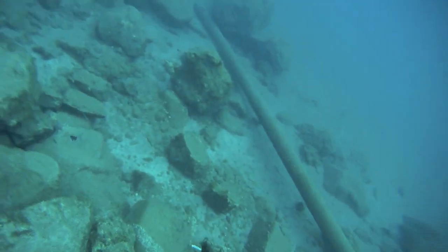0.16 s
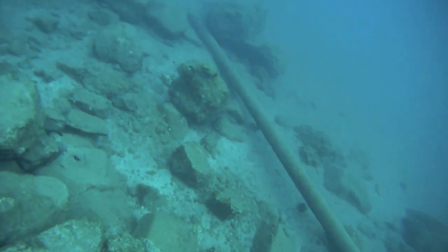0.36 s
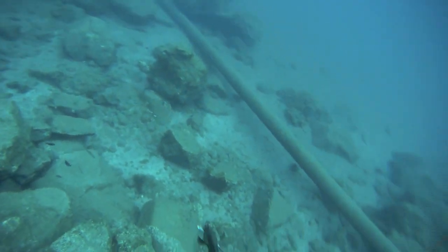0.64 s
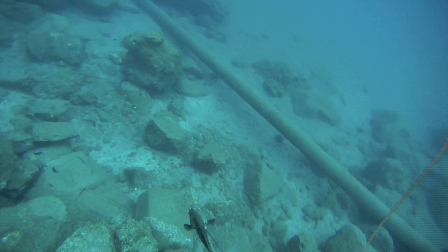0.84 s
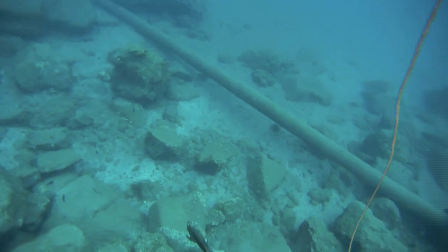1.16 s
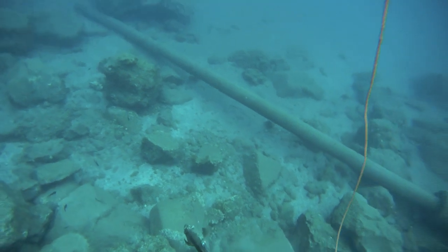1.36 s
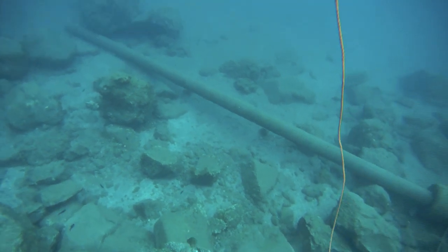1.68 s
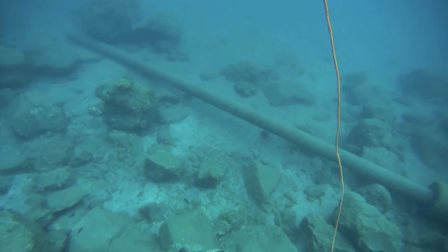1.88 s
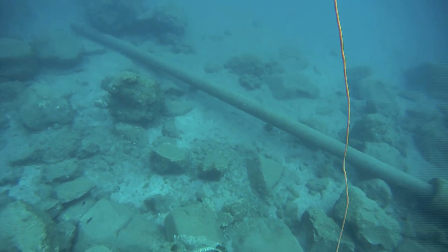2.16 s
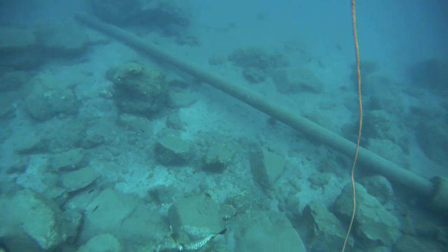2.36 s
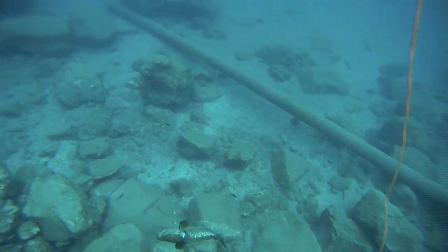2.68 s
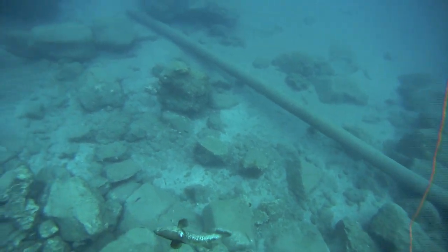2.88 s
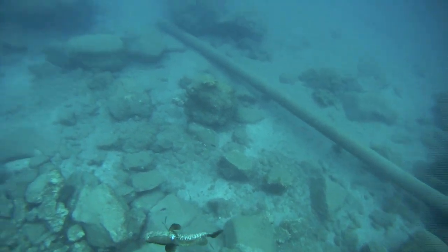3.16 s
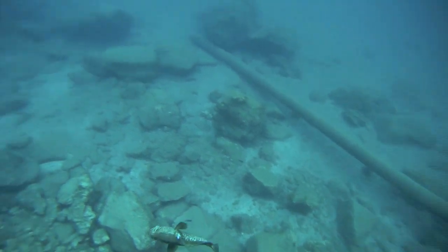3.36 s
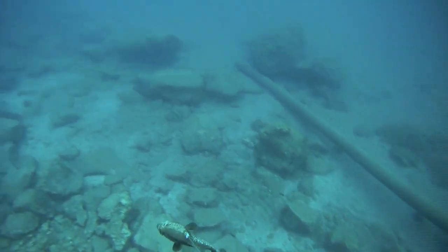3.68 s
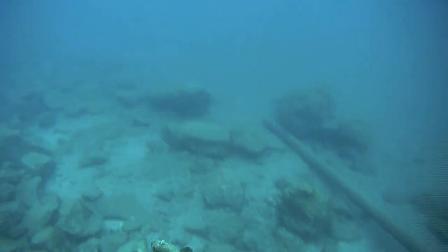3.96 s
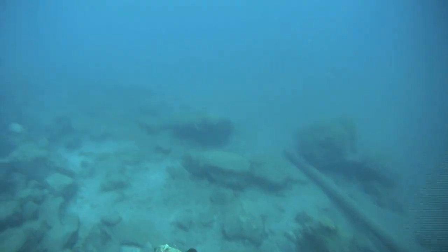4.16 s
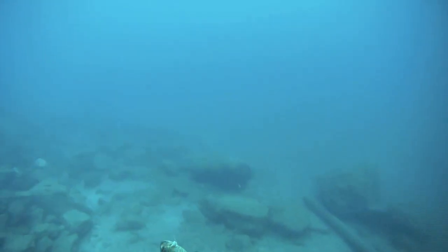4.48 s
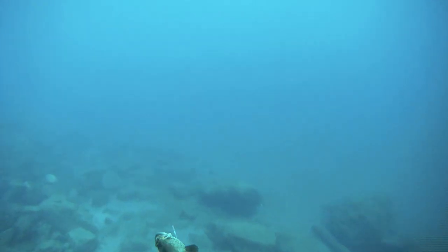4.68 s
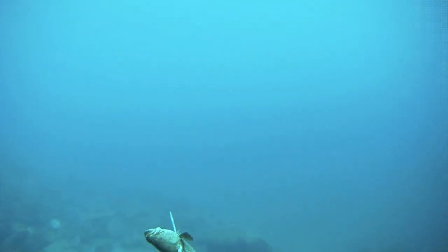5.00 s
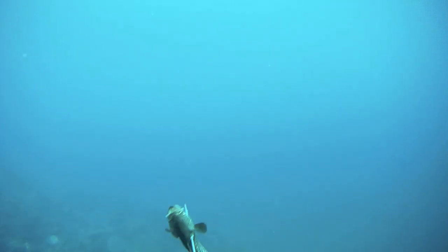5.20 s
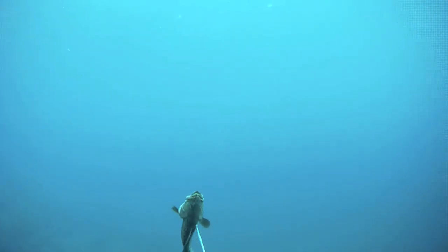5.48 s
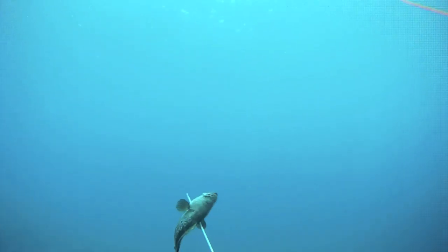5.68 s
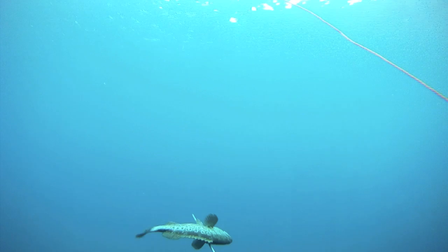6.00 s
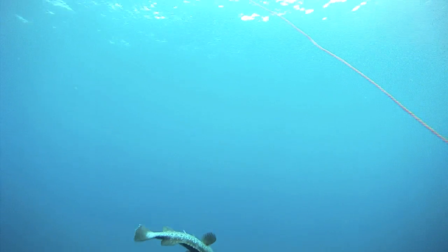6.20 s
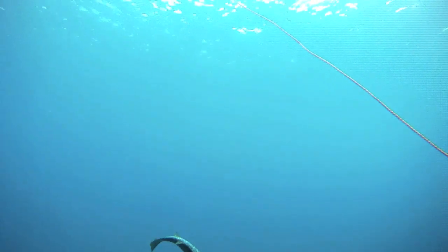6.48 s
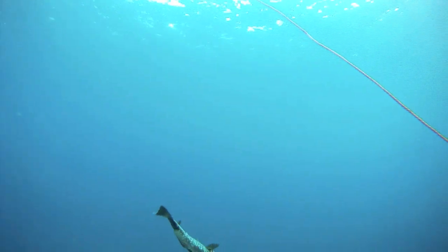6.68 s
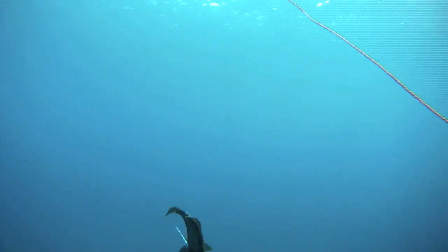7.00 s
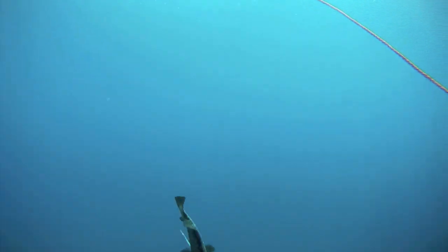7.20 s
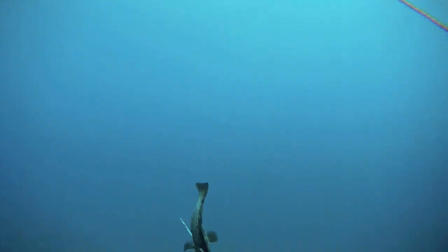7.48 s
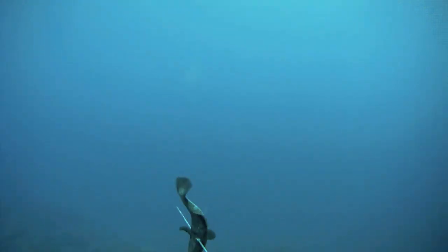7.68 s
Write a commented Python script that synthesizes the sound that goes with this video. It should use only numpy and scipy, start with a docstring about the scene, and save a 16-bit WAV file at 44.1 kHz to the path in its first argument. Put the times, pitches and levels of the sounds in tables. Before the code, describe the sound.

Muffled underwater crackling near a rocky seabed, punctuated by crisp shrimp snaps, housing taps, a cluster of thumps midway, and louder snaps later.

```python
"""Sharp shrimp snaps, near and far, over a low rumble of water, with taps and thumps close by.
Place: a rocky seabed, where a diver carries a camera in a sealed housing; its microphone hears through the wall.
Distance: near snaps are pulses with echoes, far ones a crackle; gear taps and thumps the housing itself.
Water is shaped noise, with bubbles and housing as ringing modes; thin metal parts ring as decaying sines.
The microphone is sampled at a low rate and held, which mirrors the sound into the treble."""
import sys
import numpy as np
from scipy import signal
from scipy.fft import rfft, irfft
from scipy.io import wavfile

SR = 44100
rng = np.random.default_rng(int(sys.argv[2]) if len(sys.argv) > 2 else 0)


def dump_mix(stems):
    """Bounce the given channels to the path in sys.argv[1] as a 16-bit WAV at rate SR."""
    frames = np.atleast_2d(stems).T  # one column per channel
    limited = np.clip(frames, -1, 1)  # hard clip at full scale
    pcm = np.round(limited * 32767).astype(np.int16)
    wavfile.write(sys.argv[1], SR, pcm)


def gain_from_db(level_db):
    """Convert decibel levels to linear amplitude factors (20 dB per decade)."""
    decades = np.asarray(level_db, float) / 20
    return 10 ** decades


N = 345744   # samples, 7.84 s

# Faint hiss, opposite in the two channels; relative spectrum: (frequency [Hz], density [dB per Hz])
CHANNEL_HISS = [(100, -4), (800, 5.5), (5000, -5)]
# Far crackle, before its slow wander: (time [s], level [dB])
CRACKLE_LEVEL = [(0.0, -53), (0.35, -60), (0.65, -56), (1.75, -57.5), (2.12, -56), (2.4, -58), (4.6, -58.5),
                 (5.6, -58), (6.5, -56.5), (7.84, -57)]
# Push of the water as deep rumble, before its slow wander: (time [s], level [dB])
WATER_PUSH = [(0.0, -48.5), (0.13, -46.5), (0.25, -49), (0.87, -58), (1.14, -51.5), (1.7, -60.5),
              (3.6, -62.5), (3.8, -53.5), (4.19, -48), (4.3, -59), (4.6, -53), (4.75, -58.5), (6.05, -57.5),
              (6.22, -50), (6.7, -59), (7.4, -55), (7.84, -54)]
# Relative spectrum of the deep rumble: (frequency [Hz], density [dB per Hz])
RUMBLE_SPECTRUM = [(12, -26), (25, -0.5), (40, 8.5), (70, -6.5), (120, -4.5), (150, -7), (200, -29.5),
                   (300, -56)]
# Relative spectrum of the gurgle, before stirring: (frequency [Hz], density [dB per Hz])
GURGLE_SPECTRUM = [(41, -28.5), (70, 3.5), (205, -9.5), (351, -7.5), (827, -16), (1120, -18), (1300, -14),
                   (1690, -17.5), (2860, -120)]
# What passes the housing wall, relative: (frequency [Hz], density [dB per Hz])
WALL_SPECTRUM = [(530, -46.5), (900, -26.5), (1120, -29), (1230, -9.5), (1400, -14), (1530, -8.5),
                 (2140, 0), (2980, -6), (3240, -9.5), (3590, -5), (4560, -10.5), (5080, -5.5),
                 (5700, -10.5), (7410, -61.5), (12500, -120)]
# Narrow resonances of the air space, added to the wall: (frequency [Hz], width [Hz], lift [dB])
AIR_SPACE = [(1345, 26, 3.5), (2170, 44, 2), (3604, 140, 4), (5000, 300, 0.5)]
# Thin metal parts ringing; level is before the swell:
# (time [s], level [dB], pitch [Hz], 60 dB decay [s])
METAL_RINGS = [(0.804, -37, 3880, 0.038), (4.472, -49.5, 5530, 0.33)]
# Taps on the housing; level is before the mode levels: (time [s], level [dB], favoured pitch [Hz])
HOUSING_TAPS = [(0.071, -48, 460), (0.155, -47, 374), (0.324, -48, 385), (0.389, -50, 595),
                (0.556, -47, 390), (0.77, -43, 422), (0.843, -47.5, 326), (1.201, -42, 466),
                (1.261, -41.5, 470), (1.433, -44, 405), (1.626, -44, 397), (1.787, -46, 670),
                (2.0, -46.5, 476), (2.684, -48.5, 662), (2.746, -43, 680), (3.027, -43, 670),
                (5.611, -43.5, 355), (5.799, -43, 443), (5.874, -42.5, 363), (6.495, -41, 365),
                (6.575, -44.5, 454), (7.387, -41.5, 403), (7.744, -45.5, 387)]
# Housing modes under a tap, relative level: (frequency [Hz], level [dB], 60 dB decay [s])
SHELL_MODES = [(384, -4, 0.059), (456, -5, 0.078), (670, -1, 0.066), (967, -0.5, 0.028), (1419, 0.5, 0.093),
               (600, -13, 0.036), (1170, 6, 0.014), (1870, 14, 0.006)]
# Dull thumps; level is before the onset, pitch is where the sag ends:
# (time [s], level [dB], pitch [Hz], 60 dB decay [s])
DULL_THUMPS = [(2.342, -28, 129, 0.04), (3.102, -24, 120, 0.042), (3.5088, -26, 123, 0.075),
               (3.708, -23.5, 124, 0.069), (3.742, -32, 66, 0.13), (3.779, -23.5, 107.7, 0.089),
               (3.801, -15, 295, 0.024), (6.1371, -26.5, 520, 0.018)]
# Near snaps; pulse level is before band split and wall, echo level before build-up and decay:
# (time [s], pulse level [dB], treble against body [dB], echoes against pulse [dB])
NEAR_SNAPS = [(0.1263, -37, -7, -13.5), (0.272, -40, 1, -19.5), (0.5125, -36.5, -2.5, -16.5),
              (0.5534, -38.5, 7.5, -16.5), (0.83, -32.5, -9, -18), (1.1084, -36, -2, -17),
              (1.2369, -41, 5.5, -15), (1.446, -38.5, -6, -15.5), (1.787, -39, -2.5, -12),
              (1.9467, -30, -22, -26.5), (1.982, -29.5, 8, -24.5), (2.03, -36, -14, -20),
              (2.0773, -41, 6, -13.5), (2.1465, -41.5, 6.5, -13.5), (2.227, -39, -9, -13.5),
              (2.3037, -32, -22, -23.5), (2.3344, -36, -13, -26), (2.4412, -41.5, 12, -33),
              (2.5561, -42.5, 3, -14), (2.5867, -40.5, 1.5, -14), (2.6918, -33.5, 0.5, -14),
              (2.7442, -43.5, 4, -13.5), (2.931, -40, 2.5, -16), (3.5128, -33.5, -1, -18.5),
              (3.9432, -27.5, -13, -17), (4.0156, -34, -6, -14.5), (4.141, -33, -2, -24.5),
              (4.2423, -33.5, -8, -20), (4.3291, -33.5, -6, -20.5), (4.345, -40, 11.5, -15),
              (4.359, -33.5, -5, -17), (4.373, -42, 7, -19), (4.4672, -28, -18, -25),
              (4.6299, -58, 23.5, -30), (4.758, -39.5, -2.5, -15), (5.0643, -30, -3, -24.5),
              (5.1586, -32.5, 0, -19.5), (5.3472, -29.5, -4, -21), (5.442, -35, -22, -17),
              (5.6085, -24.5, 0, -33), (5.6396, -39.5, 10, -22), (5.6898, -20.5, 6, -22.5),
              (5.706, -36.5, -17, -23), (5.7962, -37.5, -8, -18), (5.9292, -39.5, -2, -15),
              (6.0044, -26, 10, -24.5), (6.062, -34, 2, -26), (6.1372, -42, -9, -30),
              (6.204, -39.5, -1, -14.5), (6.292, -32, -10, -26), (6.364, -39, 5, -17),
              (6.415, -42, 3.5, -12.5), (6.4223, -30.5, 1.5, -18.5), (6.6583, -28.5, -18, -26.5),
              (6.9625, -35, 6.5, -17), (7.0531, -23.5, 3, -26), (7.196, -30.5, -14, -31),
              (7.3106, -25, -1.5, -20), (7.399, -29.5, 2.5, -19.5), (7.424, -36.5, -1, -21),
              (7.5325, -31, -7, -17.5), (7.6143, -31, -14, -27), (7.7662, -32.5, 3, -20)]


def rms_one(x):
    """Scale to rms 1."""
    return x / np.sqrt(np.mean(x ** 2) + 1e-20)


def level_over_time(rows):
    """Level [dB] at every sample, joined by straight lines."""
    s, level_db = np.transpose(rows)
    return np.interp(np.arange(N) / SR, s, level_db)


def drift(rate_hz):
    """Slow random wander of spread 1: noise through two equal low-passes, run at SR / 40."""
    pole = np.exp(-80 * np.pi * rate_hz / SR)
    noise = rng.standard_normal(N // 40 + 2002)
    slow = signal.lfilter([1], [1, -2 * pole, pole * pole], noise)[2000:]
    return np.interp(np.arange(N) / 40, np.arange(len(slow)), rms_one(slow))


def response(spectrum, peaks=(), size=8192):
    """Causal (minimum-phase) impulse response of a spectrum with added peaks."""
    hz = np.maximum(np.arange(size // 2 + 1) * SR / size, 1)
    points = np.array(spectrum)
    level_db = np.interp(np.log(hz), np.log(points[:, 0]), points[:, 1])
    for top_hz, width_hz, lift_db in peaks:
        level_db += lift_db / (1 + (2 * (hz - top_hz) / width_hz) ** 2)
    # folding the cepstrum onto positive times makes the phase minimal
    cepstrum = irfft(np.log(gain_from_db(np.maximum(level_db, -70))))
    cepstrum[1:size // 2] *= 2
    cepstrum[size // 2 + 1:] = 0
    return irfft(np.exp(rfft(cepstrum)))


def through(x, shape):
    """Convolve, keeping the length."""
    return signal.fftconvolve(x, shape)[:N]


def shaped_noise(spectrum, size=8192):
    """Steady noise with the given spectrum; rms 1."""
    return rms_one(through(rng.standard_normal(N), response(spectrum, size=size)))


def filtered(x, order, hz, kind="low"):
    """Butterworth filter."""
    return signal.sosfilt(signal.butter(order, hz, kind, fs=SR, output="sos"), x)


def ring(clicks, hz, t60):
    """A mode: each unit click starts a sine of height 1 that falls 60 dB in t60 seconds."""
    r, w = gain_from_db(-60 / (t60 * SR)), 2 * np.pi * hz / SR
    return signal.lfilter([0, np.sin(w)], [1, -2 * r * np.cos(w), r * r], clicks + 1e-18)


def grains(per_s, spread_db):
    """Random clicks of uneven size and sign; rms 1."""
    sizes = gain_from_db(spread_db * np.minimum(rng.exponential(1, N), 5))
    signs = rng.choice([-1, 1], N)
    return rms_one(sizes * signs * (rng.random(N) < per_s / SR))


def channel_hiss():
    """Faint shaped hiss whose level wanders; it is added to one channel and taken from the other."""
    return gain_from_db(-81.0 + 1.7 * drift(19.0)) * shaped_noise(CHANNEL_HISS)


def crackle(per_s=110, spread_db=4.0, tail_t60=0.058, tail_db=-20.0, hiss_db=-6.0, patchy_db=1.5):
    """Countless far snaps, each coloured by its path and trailing a short noisy tail, over a smooth hiss."""
    t = np.arange(round(tail_t60 * SR)) / SR
    busy = drift(8.5)
    far = 0
    # four groups of paths, each passing its own band [Hz]
    for low_hz, high_hz in ((700, 9000), (700, 2600), (1800, 4200), (3200, 9000)):
        clicks = grains(per_s * gain_from_db(3.0 * busy), spread_db)
        tail_power = np.abs(through(clicks ** 2, gain_from_db(-120 * t / tail_t60)))   # 60 dB fall of power
        tails = np.sqrt(tail_power) * rng.standard_normal(N)
        hiss = gain_from_db(hiss_db + patchy_db * drift(26)) * rng.standard_normal(N)
        swarm = rms_one(clicks + gain_from_db(tail_db) * tails) + hiss
        far = far + filtered(swarm, 2, [low_hz, high_hz], "band")
    behind_wall = rms_one(through(far, response(WALL_SPECTRUM, AIR_SPACE)))
    return gain_from_db(level_over_time(CRACKLE_LEVEL) + 1.0 * busy) * behind_wall


def bubbles(per_s=14, cycles=25.4):
    """Air pockets about the housing wobble, each falling 60 dB in some cycles of its own low pitch."""
    pitches_hz = np.geomspace(170, 500, num=10)
    return rms_one(sum(ring(grains(per_s, 3.14), hz, cycles / hz) for hz in pitches_hz))


def flow(lumpy_db=1.87, usual_push_db=-58):
    """Water pushing past the housing: lumpy deep rumble, a gurgle above it and bubbles."""
    push_db = level_over_time(WATER_PUSH)
    swing_db = push_db - usual_push_db
    stirred = np.exp(-(np.arange(N) / SR / 0.47) ** 2)   # starts stirred up, settles in about 0.47 s
    # calm level [dB] plus a share of the push's swing
    gurgle_db = -61 + 0.092 * swing_db
    bubble_db = -66.5 + 0.2 * swing_db + 11 * stirred
    gurgle = shaped_noise(GURGLE_SPECTRUM)
    churn = filtered(gurgle, 4, 520)
    gurgle = gurgle + (gain_from_db(8 * stirred) - 1) * churn   # stirring swells only the low gurgle
    deep = gain_from_db(push_db + 2.0 * drift(6.6)) * shaped_noise(RUMBLE_SPECTRUM, size=32768)
    lumpy_gurgle = gain_from_db(gurgle_db + lumpy_db * drift(14)) * gurgle
    return deep + lumpy_gurgle + gain_from_db(bubble_db) * bubbles()


def metal_rings(rise_s=0.0026):
    """Thin metal parts: each a single mode that swells in quickly and dies away."""
    out = np.zeros(N)
    for s, level_db, hz, t60 in METAL_RINGS:
        t = np.arange(round(t60 * SR)) / SR
        swell_and_decay = (1 - np.exp(-t / rise_s)) * gain_from_db(level_db - 60 * t / t60)
        out[round(s * SR):][:len(t)] += swell_and_decay * np.sin(2 * np.pi * hz * t)
    return out


def taps(focus_db=11.5, bounce_s=0.005147, bounce_db=-3.5, stray_db=-60.5):
    """A tap and its bounce ring every shell mode; each octave from the spot's pitch costs focus_db."""
    s, level_db, spot_hz = np.transpose(HOUSING_TAPS)
    at = (s * SR).astype(int)
    luck = rng.standard_normal((len(s), len(SHELL_MODES) + 1))
    gap = (bounce_s * SR * gain_from_db(2.55 * luck[:, -1])).astype(int)   # uneven wait before the bounce
    again = np.minimum(at + gap, N - 1)
    stray = gain_from_db(stray_db) * grains(25, 3.3) * np.sqrt(25 / SR)   # light touches at random
    out = np.zeros(N)
    for k, (hz, mode_db, t60) in enumerate(SHELL_MODES):
        off_pitch_db = focus_db * np.abs(np.log2(hz / spot_hz))
        blow = gain_from_db(level_db + mode_db - off_pitch_db + 2.0 * luck[:, k])
        clicks = stray * gain_from_db(mode_db - 2.7 * np.log2(hz / 400)) * rng.standard_normal(N)
        clicks[at] += blow
        clicks[again] += blow * gain_from_db(bounce_db)
        out += ring(clicks, hz, t60)
    return out


def thumps(sag=0.58, sag_s=0.0026, rise_s=0.0035, knock_hz=310, knock_db=-11.0, knock_t60=0.017):
    """A soft blow: a short knock, then the whole housing swings, its pitch sagging as the contact spreads."""
    out, knocks = np.zeros(N), np.zeros(N)
    for s, level_db, hz, t60 in DULL_THUMPS:
        t = np.arange(round(t60 * SR)) / SR
        turns = hz * (t + sag * sag_s * (1 - np.exp(-t / sag_s)))   # starts a share "sag" too high
        shape = (1 - np.exp(-t / rise_s)) * gain_from_db(level_db - 60 * t / t60)
        out[round(s * SR):][:len(t)] -= shape * np.sin(2 * np.pi * turns)
        knocks[round(s * SR)] = -gain_from_db(level_db + knock_db)
    soft = filtered(knocks, 4, 480)
    return out + ring(soft, knock_hz, knock_t60)


def snaps(echo_per_s=3000, echo_spread_db=3.5, body_t60=0.077, treble_t60=0.047,
          late_db=-14.5, late_t60=0.24, gather_s=0.00076, split_hz=3200):
    """Each snap is one sharp pulse, a ragged swarm of near echoes off the rocks and a slower wash from farther ones."""
    wall = response(WALL_SPECTRUM, AIR_SPACE)
    wall /= np.abs(wall).max()
    out = np.zeros(N)
    t = np.arange(SR // 8) / SR
    for kind, t60 in (("low", body_t60), ("high", treble_t60)):
        ragged = gain_from_db(2.46 * drift(156)) * grains(echo_per_s, echo_spread_db)
        echoes = np.pad(ragged, (0, SR))
        near_and_late = gain_from_db(-60 * t / t60) + gain_from_db(late_db - 60 * t / late_t60)
        dying = (1 - np.exp(-t / gather_s)) * near_and_late
        part = np.zeros(N + SR)
        for s, pulse_db, treble_db, echo_db in NEAR_SNAPS:
            at = round(s * SR)
            burst = echoes[at:at + len(t)] * gain_from_db(echo_db) * dying
            burst[0] += 1   # the pulse itself
            band_db = treble_db if kind == "high" else 0
            part[at:at + len(t)] += gain_from_db(pulse_db + band_db) * burst
        out += filtered(part[:N], 6, split_hz, kind)
    return through(out, wall)


def scene():
    """One microphone feeds both channels."""
    mono = crackle() + flow() + metal_rings() + taps() + thumps() + snaps()
    return np.tile(mono, (2, 1))


def roll_off(x):
    """The treble ends steeply here."""
    return signal.sosfilt(signal.butter(12, 16480, fs=SR, output="sos"), x)


def record(dry):
    """Band-limit, sample at 12 kHz and hold each sample: images appear around 6 and 12 kHz."""
    mix = dry + channel_hiss() * [[1], [-1]]
    narrow = signal.sosfiltfilt(signal.butter(8, 5800, fs=SR, output="sos"), mix)
    sampled = signal.resample_poly(narrow, 40, 147, axis=1)   # to 12 kHz
    steps = np.repeat(sampled, 4, axis=1)   # held at 48 kHz
    held = signal.resample_poly(steps, 147, 160, axis=1)[:, :N]   # back to SR
    held = np.pad(held, ((0, 0), (0, N - held.shape[1])))
    steep = signal.sosfiltfilt(signal.ellip(8, .3, 40, 15230, fs=SR, output="sos"), held)
    finished = steep + gain_from_db(-21) * (held - steep)   # the very top steps down
    return roll_off(finished)


dry = scene()
out = record(dry)
dump_mix(out)
```